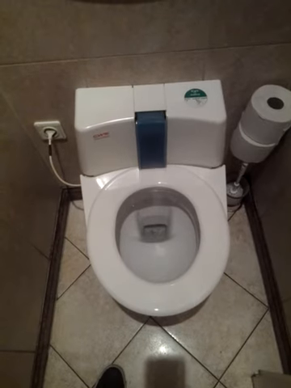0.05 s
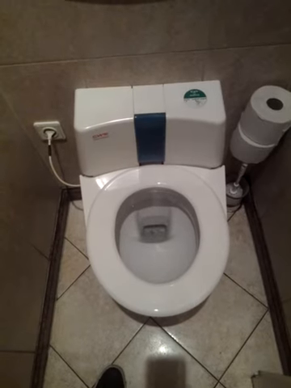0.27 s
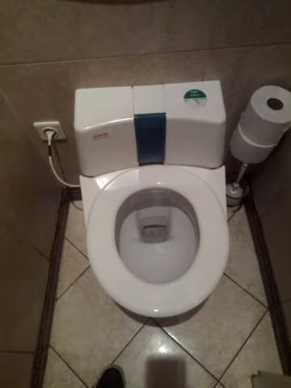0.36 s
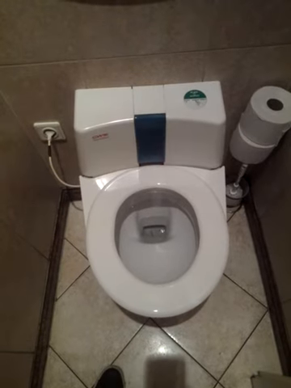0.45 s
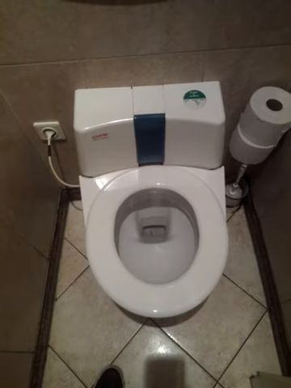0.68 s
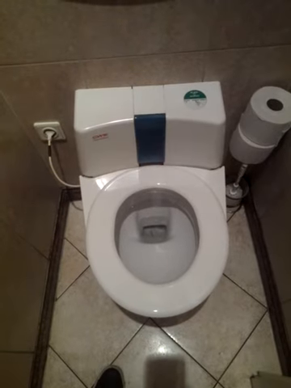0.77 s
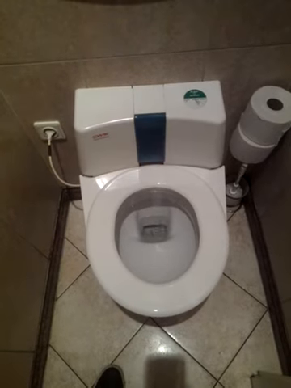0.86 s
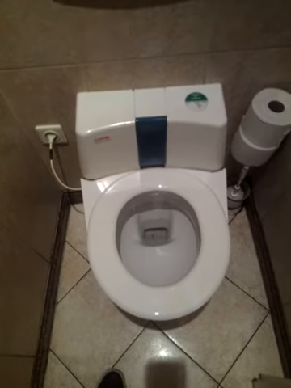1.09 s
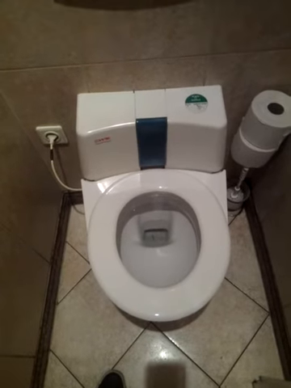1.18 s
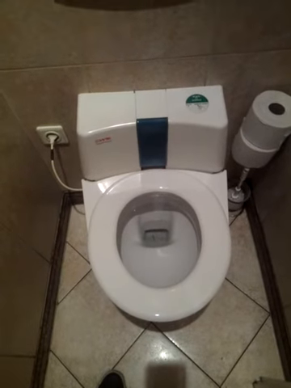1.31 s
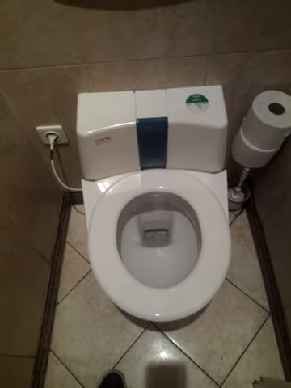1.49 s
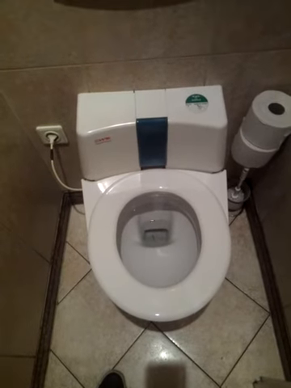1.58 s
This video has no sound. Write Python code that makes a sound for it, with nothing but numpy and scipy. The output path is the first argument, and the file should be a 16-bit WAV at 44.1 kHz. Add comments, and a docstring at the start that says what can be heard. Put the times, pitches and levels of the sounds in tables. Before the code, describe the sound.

One sharp plastic clack rings through a small tiled restroom as a toilet's panel squeaks home, snaps shut and rattles against its hollow housing. The nearby microphone also catches a soft ventilation rush and two faint late scuffs.

```python
"""A small tiled room with a toilet unit, in near-centred stereo over a steady rush of ventilation.
A plastic panel slides home with a thin squeak, snaps shut and rattles briefly. Each contact cracks,
rings the hollow housing and comes back to the microphone off the tiles. Two soft scuffs follow,
probably shoes and clothing."""
import sys
import numpy as np
from scipy import signal
from scipy.fft import rfft, irfft
from scipy.io import wavfile
from scipy.ndimage import uniform_filter1d

SR = 44100
rng = np.random.default_rng(int(sys.argv[2]) if len(sys.argv) > 2 else 0)


def transcribe(signal):
    """Save signal, clipped to [-1, 1], as a 16-bit WAV file at the path in sys.argv[1]."""
    frames = np.atleast_2d(signal).T
    limited = np.clip(frames, -1, 1)
    pcm = np.round(limited * 32767).astype(np.int16)
    wavfile.write(sys.argv[1], SR, pcm)


N = 72765
TIME_S, BIN_HZ = np.arange(N) / SR, np.arange(N // 2 + 1) * SR / N
OPPOSITE_SIDES = np.array([[1], [-1]])

# Contacts of the panel: start_s, level_db, tilt_db_per_octave, housing_ring_db
CONTACTS = [(.2006, -16.5, 7.5, -26), (.2030, -3.5, 0.5, -6.5), (.2056, -1.5, 1, 4), (.2128, 2.5, 0, -0.5),
            (.2275, -1, 2, -1), (.2385, -5, 0, 0), (.2525, -9.5, -1.5, -3.5), (.2640, -8, 1, -4.5),
            (.2735, -5.5, 0.5, -9.5), (.2825, -8.5, 0, -17), (.320, -20, 4.5, -13), (.333, -15, 3, -4),
            (.612, -27, -2.5, 1)]
# Spectrum of the plastic's crack: frequency_hz, level_db
CRACK_SPECTRUM = [(90, -55), (140, -7.5), (240, -1.5), (600, 4), (780, -1.5), (1100, 1), (1700, -7.5),
                  (2600, -5.5), (4000, -9.5), (4800, -18), (6500, -28.5), (8100, -43), (9000, -56)]
# Treble resonances of the panel: centre_hz, width_hz, boost_db
PANEL_RESONANCES = [(1843, 100, 6), (2154, 92, 7), (2270, 77, 1), (2890, 200, 3), (3627, 130, 7.5),
                    (3986, 40, 9), (4670, 94, 6), (5240, 220, 7.5), (5920, 130, 10.5), (6450, 74, 6),
                    (6630, 130, 7), (7200, 110, 6), (7400, 90, 10), (8130, 100, 15)]


def undb(db):
    """Decibels to gain."""
    return 10 ** (np.asarray(db) / 20)


def over_hz(points):
    """A curve across the spectrum, interpolated in log frequency."""
    hz, value = np.array(points).T
    return np.interp(np.log(BIN_HZ + 1e-9), np.log(hz), value)


def over_time(points):
    """A curve through points in time."""
    return np.interp(TIME_S, *np.array(points).T)


def noise(spectrum, resonances=(), side_db=-14):
    """Coloured stereo noise near unit level, mostly alike on both sides."""
    peaks_db = sum(boost / (1 + (2 * (BIN_HZ - hz) / width) ** 2) for hz, width, boost in resonances)
    mid, side = irfft(rfft(rng.standard_normal((2, N))) * undb(over_hz(spectrum) + peaks_db), N)
    return (mid + undb(side_db) * side * OPPOSITE_SIDES) / mid.std()


def wander(rate_hz):
    """Smooth random drift of unit spread."""
    hold = int(SR / rate_hz)
    steps = np.repeat(rng.standard_normal(N // hold + 1), hold)
    drift = uniform_filter1d(uniform_filter1d(steps, hold), hold)[:N]
    return drift / drift.std()


def decay(t60_s, start_s=0):
    """Full level until start_s, then a fall of 60 dB every t60_s."""
    return np.exp(-np.log(1000) * np.maximum(TIME_S - start_s, 0) / t60_s)


def tilt(sound, db_per_octave):
    """Brighten or dull a sound around 1 kHz."""
    octaves = np.log2(np.maximum(BIN_HZ, 200) / 1000)
    return irfft(rfft(sound) * undb(db_per_octave * octaves), N)


def ventilation(flutter_db=0.5, fan_waver=0.35):
    """Room tone: a slightly fluttering rush coloured by its duct, with wavering fan tones."""
    # Spectrum of the moving air: frequency_hz, level_db
    air_spectrum = [(25, -10), (105, -16.5), (150, -7.5), (270, -0.5), (450, -0.5), (800, 1), (1250, -5),
                    (1800, -13.5), (3000, -10.5), (3900, -10.5), (4400, -19.5), (5100, -18.5), (6500, -23),
                    (8200, -29.5), (8800, -49.5)]
    # Slow drift of the rush: time_s, level_db
    air_level = [(0, -49.5), (.6, -46.5), (.9, -51.5), (1.2, -49.5), (1.65, -48)]
    # Duct resonances: centre_hz, width_hz, boost_db
    duct_resonances = [(494.5, 90, 2.5), (767, 8.3, 6.5), (1194, 17, 8), (1525, 19, 8), (2160, 21, 9.5),
                       (3310, 28, 9), (3930, 29, 10), (4940, 100, 9), (5360, 61, 5.5), (5800, 30, 11)]
    # Fan tones: pitch_hz, level_db
    fan_tones = [(136, -64), (533, -54), (748, -61.5)]
    fan = 0
    for hz, db in fan_tones:
        waver = 1 + fan_waver * (wander(30.96) + 1j * wander(30))  # in both level and phase
        fan += undb(db) * np.real(waver * np.exp(2j * np.pi * hz * TIME_S))
    rush_gain = undb(over_time(air_level) + flutter_db * wander(14.2))
    return rush_gain * noise(air_spectrum, duct_resonances) + fan


def panel_slide(squeak_hz=1126, wobble=0.006, octave_db=-48.5, rub_db=-46):
    """Plastic rubs and squeaks, dying away once the panel lands; the squeak's octave flares once."""
    # Course of the squeak: time_s, level_db
    squeak_level = [(0, -37.5), (.015, -39.5), (.042, -51), (.065, -39.5), (.115, -42), (.17, -48),
                    (.2, -69)]
    # Spectrum of the rubbing plastic: frequency_hz, level_db
    rub_spectrum = [(100, -27), (140, -22.5), (300, 7), (420, -10.5), (700, 0), (1300, -6.5), (1900, -11.5),
                    (3400, -6.5), (4000, -9), (5000, -16.5), (8000, -28), (9000, -63)]
    phase = 2 * np.pi * np.cumsum(squeak_hz * (1 + wobble * wander(160))) / SR
    squeak = undb(over_time(squeak_level)) * np.sin(phase)
    flare = np.exp(-((TIME_S - 0.075) / 0.019) ** 2)
    octave = undb(octave_db) * flare * np.sin(2 * phase)
    rub = undb(rub_db) * noise(rub_spectrum)
    return decay(0.97, start_s=CONTACTS[0][0]) * (np.sqrt(2) * (squeak + octave) + rub)


def panel_clack(housing_db=-32, crack_db=-21, contact_s=0.00074, bass_cut_hz=120):
    """Each contact cracks, rings the housing and fills the room; the knocks carry no deep bass."""
    # Modes of the hollow housing: pitch_hz, relative_level_db, t60_s
    housing_modes = [(257, -3.5, 0.51), (287.05, -4.5, 0.47), (393, -7.5, 0.34), (421.7, -12, 1),
                     (501.1, 9, 0.21), (572.5, 9.5, 0.15), (612, 1.5, 0.4), (669, -11, 0.85),
                     (826, -13, .45), (1005.5, -10.5, 0.41), (1115, -7.5, 0.26), (1377.4, 3, 0.11),
                     (2110, -16, 0.6), (2440, -10, 0.39)]
    room = tile_reflections()
    ring = sum(undb(housing_db + db) * np.sin(2 * np.pi * hz * TIME_S) * decay(t60_s)
               for hz, db, t60_s in housing_modes)
    attack = np.minimum(TIME_S / contact_s, 1)
    clack = np.zeros((2, N))
    for start_s, level_db, db_per_octave, ring_db in CONTACTS:
        crack = undb(crack_db) * noise(CRACK_SPECTRUM, PANEL_RESONANCES) * decay(t60_s=0.097)
        hit = tilt((undb(ring_db) * ring + crack + room) * attack, db_per_octave)
        onset = int(start_s * SR)
        clack[:, onset:] += undb(level_db) * hit[:, :N - onset]
    return signal.sosfilt(signal.butter(4, bass_cut_hz, "high", fs=SR, output="sos"), clack)


def tile_reflections(room_db=-31.5, build_s=0.0045):
    """Dense reflections of a crack off the tiles; the treble dies first."""
    # Reverberation of the room: band_hz, t60_s
    room_decay = [(150, 1.0), (450, 1), (1000, 0.82), (2500, 0.57), (4500, 0.66), (8000, 0.13)]
    wash, tail = rfft(noise(CRACK_SPECTRUM, PANEL_RESONANCES)), 0
    for band_hz, t60_s in room_decay:
        band = over_hz([(hz, hz == band_hz) for hz, _ in room_decay])  # crossfades into its neighbours
        tail += irfft(wash * band, N) * decay(t60_s)
    build_up = 1 - np.exp(-TIME_S / build_s)
    return undb(room_db) * tilt(tail, db_per_octave=-0.58) * build_up


def scuffs():
    """Faint rubbing sounds that swell and fade."""
    # Swell of each scuff: peak_s, half_width_s, level_db
    swells = [(1.407, 0.025, -47), (1.565, 0.016, -50)]
    # Spectrum of the scuffing: frequency_hz, level_db
    scuff_spectrum = [(100, -33), (250, -7), (650, 4), (1400, -8), (2200, -13), (4000, -14), (8000, -53)]
    envelope = sum(undb(db) * np.exp(-((TIME_S - peak_s) / half_width_s) ** 2)
                   for peak_s, half_width_s, db in swells)
    return noise(scuff_spectrum) * envelope


def scene():
    """At the microphone: slide, clack and two late scuffs over the room tone."""
    return panel_slide() + panel_clack() + scuffs() + ventilation()


def record(dry, widen_s=0.001578, widen_db=-6, top_hz=9000):
    """The recorder widens the image with a short delay of opposite sign on each side; the top is cut."""
    delayed = irfft(rfft(dry.mean(axis=0)) * np.exp(-2j * np.pi * BIN_HZ * widen_s), N)
    wide = dry + undb(widen_db) * delayed * OPPOSITE_SIDES
    return signal.sosfilt(signal.ellip(10, .2, 70, top_hz, fs=SR, output="sos"), wide)


dry = scene()
out = record(dry)
transcribe(out)
```